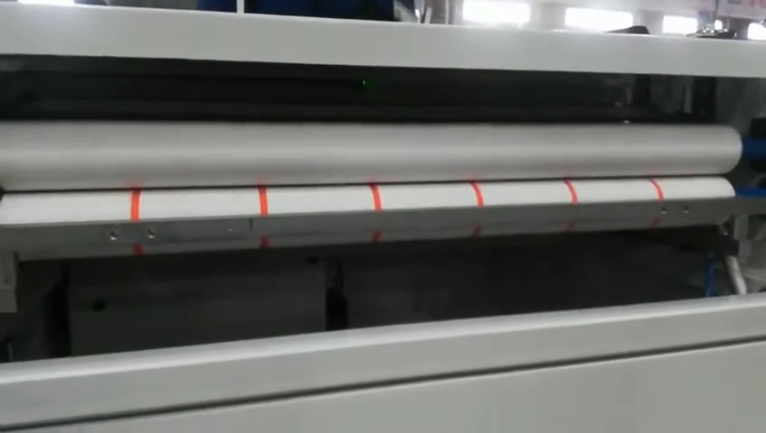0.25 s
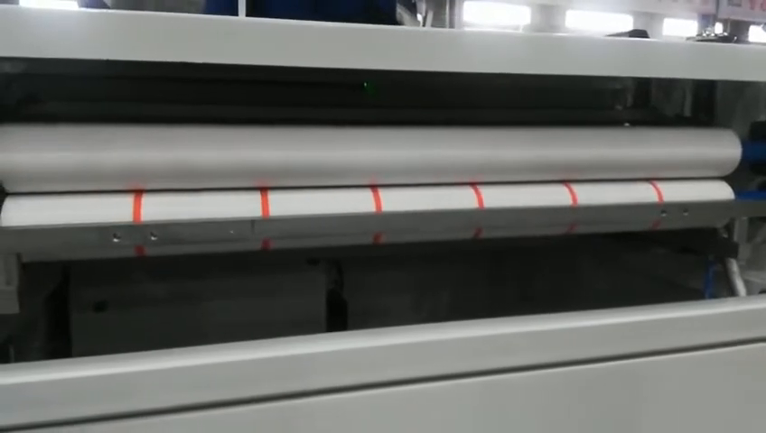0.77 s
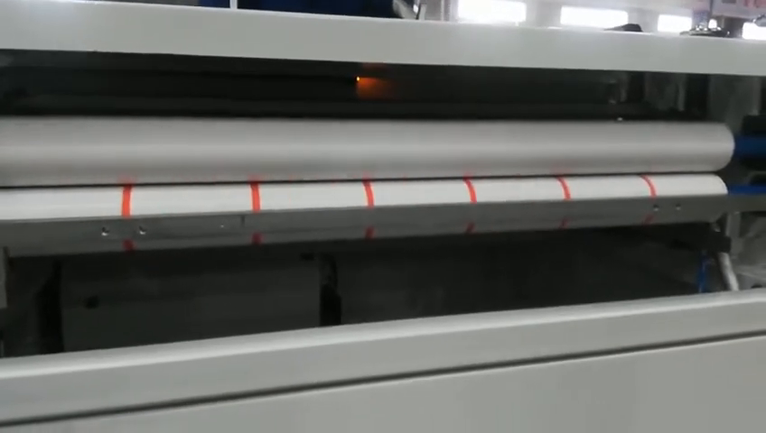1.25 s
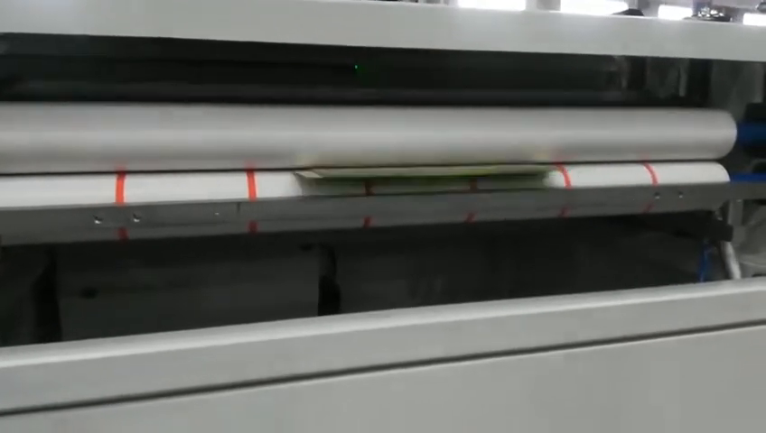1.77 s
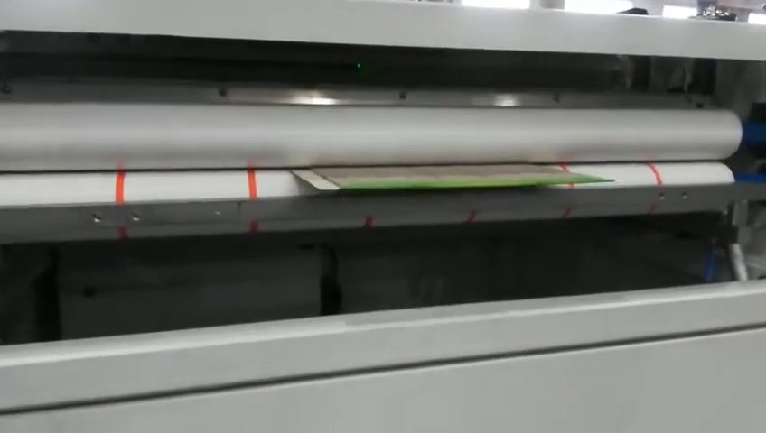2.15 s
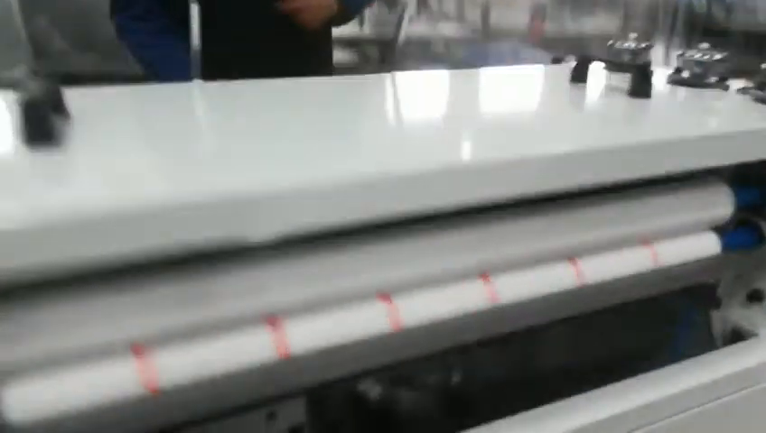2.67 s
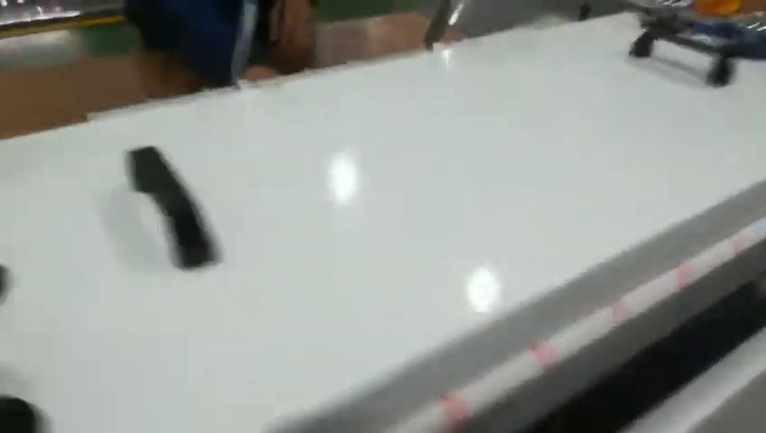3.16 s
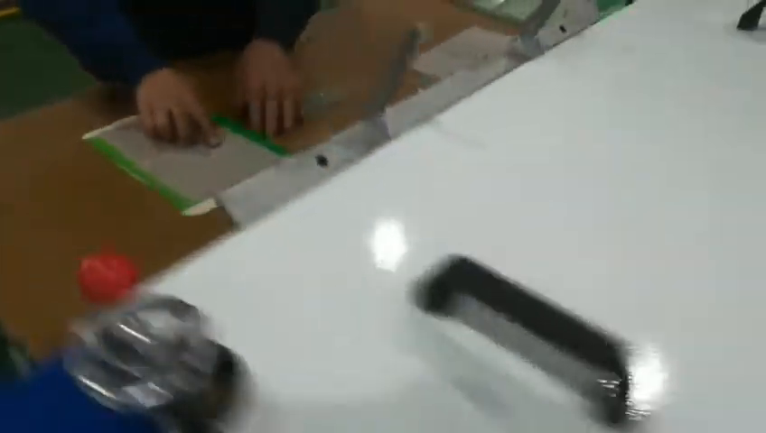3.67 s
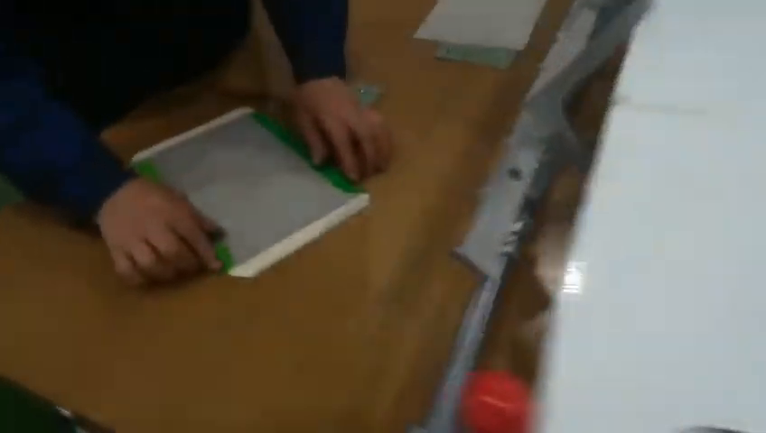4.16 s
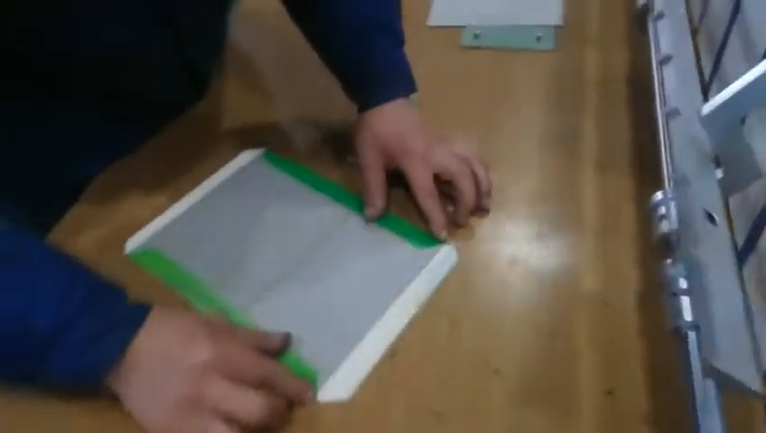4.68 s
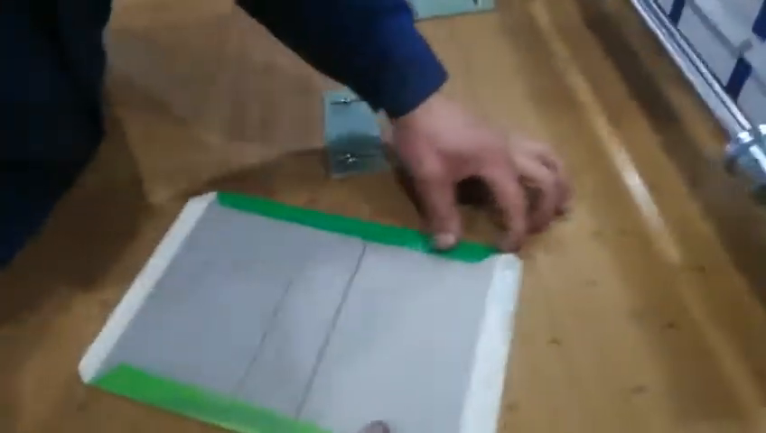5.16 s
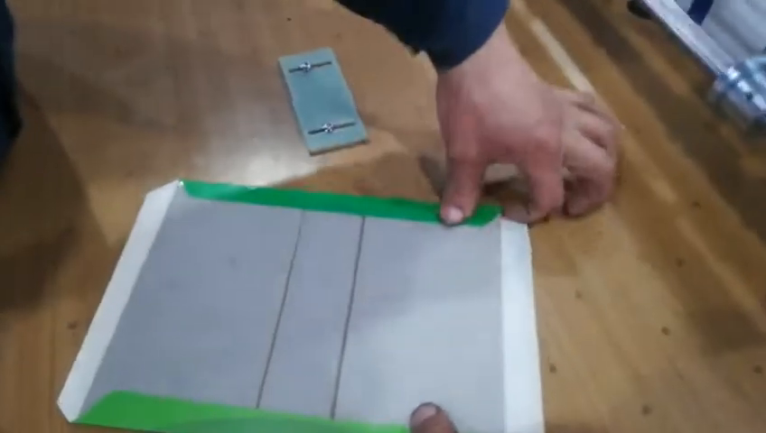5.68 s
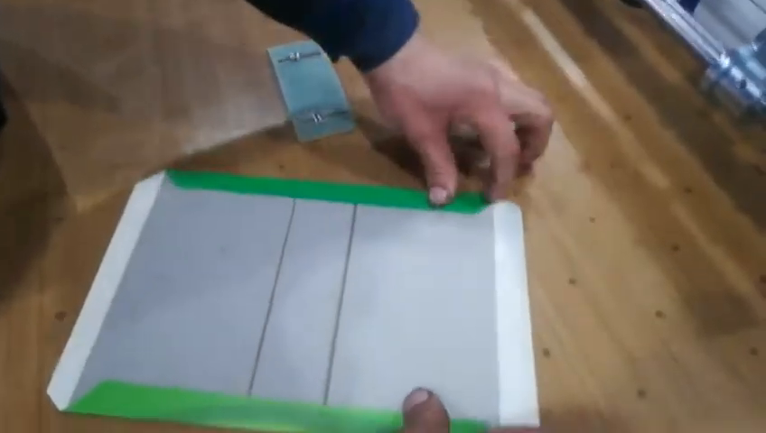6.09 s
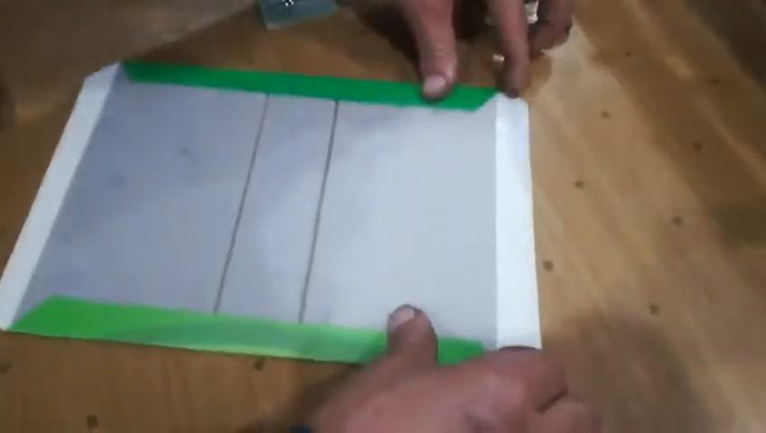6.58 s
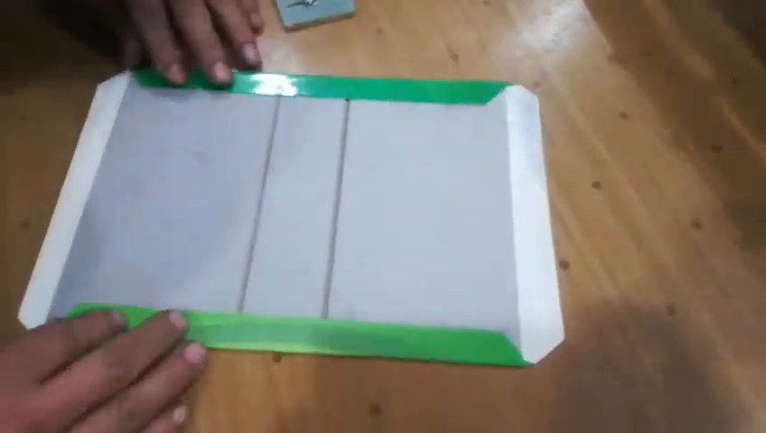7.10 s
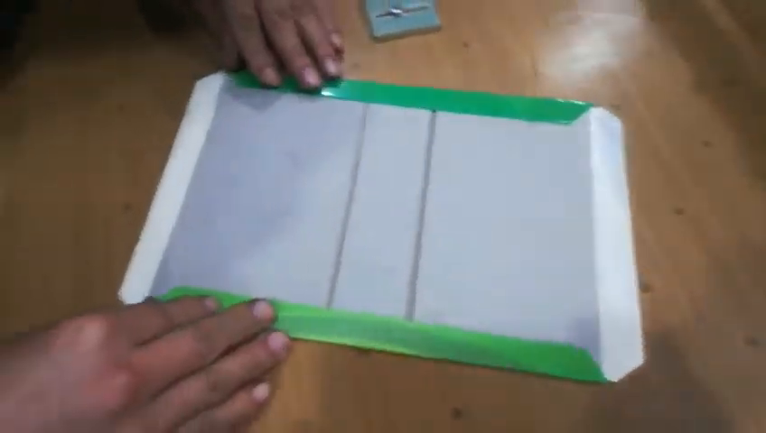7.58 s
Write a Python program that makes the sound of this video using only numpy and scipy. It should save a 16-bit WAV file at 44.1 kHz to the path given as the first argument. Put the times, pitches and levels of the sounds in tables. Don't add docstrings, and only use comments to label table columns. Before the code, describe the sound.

Beside a folding machine in a hard-walled factory hall, a motor hums and belts whirr throughout. After half a second, steel bars and covers start clattering close by, getting brighter and harder in a rapid irregular series until about three seconds. A valve then whistles and squeals, releasing a hissing air jet that fades, leaving the steady drone. Captured on a handheld phone, with soft grip thumps.

```python
import sys
import numpy as np
from scipy import signal
from scipy.fft import rfft, irfft
from scipy.io import wavfile
from scipy.ndimage import uniform_filter1d, minimum_filter1d

SR = 44100
rng = np.random.default_rng(int(sys.argv[2]) if len(sys.argv) > 2 else 0)


def generate_wav(sig):
    pcm = np.round(np.clip(np.atleast_2d(sig).T, -1, 1) * 32767).astype(np.int16)
    wavfile.write(sys.argv[1], SR, pcm)


def elevation(decibels):
    levels = np.asarray(decibels, float)
    return 10 ** (levels / 20)


N = 345744
TIME = np.arange(N) / SR
HZ = np.maximum(np.arange(N // 2 + 1) * SR / N, 1)

# pitch_hz, likeness (-1 to 1)
PORT_LIKENESS = [(60, 0.99), (130, 1), (290, 0.89), (640, -0.62), (1410, -0.065), (3100, -0.027),
                 (6820, -0.018), (15000, -0.051)]
# pitch_hz, left_minus_right_db
CLATTER_TILT = [(60, 0.0), (110, -11), (200, 12), (380, -2), (700, 2), (1290, 2), (2380, 9.5), (4400, -5.5),
                (8120, 6), (15000, 6)]
# pitch_hz, left_minus_right_db
JET_TILT = [(60, 0.5), (110, 0.5), (200, 0.5), (380, 0.0), (700, -5), (1290, 4), (2380, 4), (4400, -1.5),
            (8120, 4), (15000, 5)]
# start_s, level_db, length_s
GRIP_SHIFTS = [
    (0.44, -47, 0.087),
    (1.72, -37, .04),
    (1.84, -35, .06),
    (2.05, -43, .08),
    (2.64, -52, .1),
    (3.127, -46, 0.34),
    (3.82, -52, 0.11),
    (5.39, -51, 0.33),
    (7.6, -47, .2),
]
LEFT_DB = 0.5
DIRECT_SHARE, DIRECT_LAG = 0.26, 8
THRUM_DB = -53.5

# start_s,
# motor_db, belts_db
DRIVE_LEVELS = [(0, -44, -38), (0.6, -44, -41.5), (1.1, -44, -41.5), (1.8, -42.5, -49), (2.08, -40.5, -53),
                (2.6, -43, -38.5), (3.2, -41, -41), (4.3, -43.5, -40.5), (4.8, -41.5, -41.5),
                (6.4, -40.5, -41.5), (7.84, -42, -42)]
# pitch_hz, level_db (per Hz)
DRONE_COLOUR = [(35, -45), (60, -11), (76, -9.5), (98, -4), (135, -5.5), (188, -2.5), (408, -14.5),
                (470, -23.5), (500, -13.5), (650, -89), (1100, -120)]
# pitch_hz, level_db (per Hz)
WHIRR_COLOUR = [(210, -35), (350, -10), (500, -9), (760, -5), (1500, -11.5), (3700, -13), (4350, -7.5),
                (5000, -10.5), (6900, -15.5), (7300, -22), (10500, -33), (12000, -60), (15000, -56),
                (15700, -54)]
# pitch_hz, width_hz, level_db
GEAR_LINES = [(202.8, 19, -50), (148, 23, -64), (294.7, 15, -56), (719, 6.4, -60.5), (1758, 18, -59.5),
              (2355, 370, -53), (3376, 65, -65), (4140, 230, -66), (2794, 8, -66.5), (6300, 8, -79),
              (7000, 6, -77), (9120, 40, -75), (10510, 25, -78)]
# start_s, level_db, length_s
MOTOR_SURGES = [(0.736, -35, 0.54), (0.76, -39, 0.08), (0.925, -40.5, 0.24), (1.033, -39, 0.082),
                (1.186, -38, 0.13), (1.338, -31, 0.048), (1.447, -36.5, .12), (1.585, -34.5, 0.24),
                (1.807, -43, 0.296), (2.082, -36, 0.11), (2.288, -48, 0.21), (2.623, -45, 0.41)]
# pitch_hz, width_hz, level_db
HOUSING_MODES = [(108, 16, -9), (156.3, 17.5, 2.5), (248, 87, -4.5), (309, 14.5, 4.5)]
# start_s, level_db
COASTING = [
    (0, -37.5),
    (0.31, -54),
    (0.544, -75),
    (0.57, -60),
    (0.7, -44),
]
# pitch_hz, level_db (per Hz)
RUBBER_COLOUR = [(1180, -37), (2000, -13), (2750, 2.5), (3550, -11), (4150, 5), (4940, -12), (5780, 2),
                 (8000, -39), (10400, -56), (17600, -120)]
GEAR_DB, LOAD_RISE_S = 45, 0.02

# start_s, level_db, left_minus_right_db
HISS_LEVELS = [
    (3.3, -48, 2),
    (3.56, -43, 1),
    (3.8, -45.5, 2),
    (3.97, -35.5, 1),
    (4.2, -30.5, -0.5),
    (4.9, -30.5, 0),
    (5.08, -34, 0),
    (5.4, -46.5, 1),
    (5.6, -58, 0),
]
# pitch_hz, level_db (per Hz)
JET_COLOUR = [(590, -54), (1000, -34), (1290, -47), (1350, -29), (1690, -16), (1830, -18), (2670, -10),
              (3760, -9.5), (4430, -3.5), (6400, -4.5), (9000, -19.5), (11700, -37.5), (19800, -120)]
# pitch_hz, level_db (per Hz)
SIZZLE_COLOUR = [(5290, -19), (9000, 0.5), (9550, -2), (11800, -19), (14600, -24), (15500, -32)]
# start_s, end_s, pitch_hz, level_db, throb_hz
WHISTLES = [
    (3.38, 3.634, 5460, -51, 18),
    (3.55, 3.78, 4080, -51, 12),
    (3.682, 3.785, 5760, -42.5, 30),
    (3.825, 3.842, 5730, -46, 3),
]
# start_s, level_db, length_s
SQUEAL_SPURTS = [(3.73, -48, .42), (3.793, -36, .036), (3.838, -36, .028), (3.85, -42, .03),
                 (3.886, -38, .038), (3.905, -42, .02), (3.932, -39, .04), (3.976, -34, .028),
                 (4.001, -33, .024), (4.018, -37, .05), (4.068, -40, .04), (4.125, -42, .03)]
SQUEAL_HZ, SPURT_EDGE_S = 5125, 0.012
SIZZLE_DB, CRACK_S, CRACK_DB, CRACK_WIDTH_S = -17, 3.98, 9.5, 0.21

# start_s, peak_db, fade_s, cover_db
SLAMS = [(0.565, -34, 0.12, -2), (0.738, -22.5, 0.26, -1), (0.8939, -26.5, 0.5, -4.5),
         (0.9444, -19.5, 0.19, -17), (1.0131, -27, 0.11, -3), (1.0635, -23.5, .093, -5),
         (1.1124, -46, 0.072, -13), (1.1735, -21, 0.096, 0), (1.2623, -23, 0.12, -2),
         (1.2929, -9.5, 0.086, -16), (1.3187, -7.5, 0.11, -17), (1.5724, -3.5, 0.27, -24),
         (1.6821, -10.5, 0.23, -12), (1.8897, -20.5, 0.24, -28), (1.9446, -21.5, 0.069, -17),
         (1.9919, -29.5, 0.11, -3), (2.151, -19.5, .14, -25), (2.1899, -7, 0.23, -14.5),
         (2.2882, -13.5, 0.21, -11), (2.4495, -12, .16, -12), (2.4812, -.6, 0.14, -16),
         (2.848, -23, 0.09, -23), (2.8645, -9.5, 0.3, -11), (2.9602, -11.5, .22, -7.5),
         (3.047, -21.5, 0.083, -3)]
# start_s, peak_db, fade_s, cover_db
SLIPS = [(0.7515, -12.5, 0.081, -9), (0.7752, -27, 0.33, -9), (0.815, -17, 0.075, -5),
         (0.9647, -11.5, 0.08, -4), (1.1944, -25.5, 0.24, -21), (1.2214, -22.5, 0.086, 1),
         (1.3364, -6, .13, -15), (1.3624, -12.5, 0.17, -13), (1.4558, -11.5, 0.094, -28),
         (1.466, -1, 0.091, -32), (1.5894, 0, 0.13, -8), (1.6089, -6, 0.15, -27), (1.6314, -13, .13, -20),
         (1.6991, -8.5, .13, -5.5), (1.7354, -6, 0.17, -9), (1.7555, -11.5, 0.14, -12),
         (1.799, -17, 0.2, -9), (1.8422, -18, 0.13, -7), (2.1325, -18, 0.13, -13),
         (2.2044, -6.5, .12, -4.5), (2.24, -8.5, 0.13, -9), (2.261, -17.5, 0.087, -17),
         (2.5118, -8, 0.17, -5.5), (2.5497, -4.5, 0.13, -12), (2.5967, -7, .13, -14),
         (2.643, -10.5, .13, -16), (2.7144, -15.5, 0.054, -4.5), (2.8774, -6, .16, -0.5),
         (2.9258, -17, 0.2, -5), (2.9792, -11.5, 0.087, 0.5)]
# start_s, level_db, left_minus_right_db
LOOSE_PARTS = [
    (0.5, -60, 0),
    (0.6, -40, -3),
    (0.96, -35, -2),
    (1.4, -41.5, -2.5),
    (1.63, -23.5, -2),
    (1.79, -35, -3),
    (1.95, -43.5, -0.5),
    (2.45, -33.5, 0.3),
    (3.25, -54, -2),
]
# start_s, pitch_hz, level_db, length_s, width_hz
RINGING_PARTS = [(0.75, 5180, -28, 0.058, 180), (0.754, 2140, -29.5, 0.017, 170),
                 (1.17, 4000, -28.5, 0.074, 250), (1.291, 1230, -27.5, 0.017, 250),
                 (1.58, 1050, -36.5, 0.25, 36), (2.205, 880, -36, 0.031, 54),
                 (2.42, 1290, -30.5, 0.028, 300), (2.646, 4350, -16, .016, 300),
                 (2.875, 2470, -26, .035, 250), (3.11, 2450, -37, .03, 300), (2.93, 5350, -26, .02, 200),
                 (1.58, 6200, -22, .07, 900), (2.195, 6500, -21, .04, 800), (2.485, 6900, -22, .03, 990),
                 (1.458, 11500, -44, .04, 4000), (2.862, 4960, -15, 0.065, 240),
                 (2.864, 740, -23.5, 0.011, 270), (2.899, 472, -38, 0.24, 81),
                 (3.043, 2430, -34.5, 0.047, 300), (4.324, 4500, -35, 0.064, 270),
                 (1.19, 1400, -38, 0.15, 560), (1.601, 720, -32, 0.23, 190), (2.194, 1250, -31, 0.2, 250),
                 (2.484, 1530, -37, 0.12, 460), (2.645, 1520, -31, 0.019, 1200),
                 (2.867, 800, -29.5, 0.14, 410), (0.57, 2200, -43, .03, 230), (0.103, 718, -51, 0.81, 55),
                 (2.032, 940, -38, 0.13, 660), (3.098, 2350, -49, 0.037, 280), (0.95, 527, -40, .2, 300),
                 (0.565, 790, -44, 0.3, 350)]
# start_s, peak_db
TICKS = [(0.757, -15), (0.931, -18), (1.231, -18), (1.321, -8), (1.583, -8), (1.591, -7), (1.600, -7),
         (1.615, -5), (1.739, -10), (2.195, -7), (2.202, -7), (2.244, -11), (2.559, -11), (2.866, -5),
         (2.872, -8), (2.881, -5), (2.895, -8), (2.985, -11)]
# pitch_hz, level_db (per Hz)
STEEL_COLOUR = [(1760, -23), (3000, -10.5), (3390, -11), (4810, 0.5), (5390, -1), (6430, -3.5), (7500, -14),
                (9750, -37), (16500, -120)]
# pitch_hz, level_db (per Hz)
EDGE_COLOUR = [(4410, -17.5), (7500, -3.5), (9130, -5.5), (10100, -13), (11200, -14), (12300, -28.5),
               (14200, -33), (15500, -45)]
# pitch_hz, level_db (per Hz)
COVER_COLOUR = [(1120, -9.5), (1900, -4), (2530, -2), (2730, -2.5), (3000, -2.5), (3900, 1.5), (6600, -120)]
# pitch_hz, level_db (per Hz)
FRAME_COLOUR = [(260, -41), (450, 0), (536, -4.5), (783, 3.5), (956, -2.5), (1160, 3.5), (1900, -5.5),
                (2470, -30), (4180, -120)]
FOLD_S = 1.21
EDGE_DB, FRAME_DB = (-26, -10.5), (-11.5, -28)
EDGE_PER_DB, FRAME_PER_DB = 0.58, -0.25
SHAKE_EDGE_DB, SHAKE_COVER_DB, SHAKE_FRAME_DB = (-26, -20), -4, -4.5
SLAM_RISE_S, SLIP_RISE_S = 0.001, 0.011
TICK_DB, TICK_T60_S, TICK_RISE_S = -8, 0.015, 0.0005
HALL_T60_S, HALL_DB = 0.7, -8


def unit(x):
    return x / np.sqrt(np.mean(x ** 2))


def columns(table):
    start_s, *rest = np.transpose(table)
    return [np.interp(TIME, start_s, column) for column in rest]


def fade(start, end, edge):
    return np.clip((TIME - start) / edge, 0, 1) * np.clip((end - TIME) / edge, 0, 1)


def decay(t, t60):
    return np.exp(-np.log(1000) * t / t60)


def spread(pan_db):
    return elevation(np.array([pan_db, -pan_db]) / 2)


def colour(x, points, share=1):
    hz, db = np.transpose(points)
    n = x.shape[-1]
    axis = np.arange(n // 2 + 1) * SR / n
    curve_db = np.interp(np.log(axis + 1), np.log(hz), db)
    return irfft(rfft(x) * elevation(share * curve_db), n)


def tilt(x, points, left_share, right_share):
    return np.array([colour(x[0], points, left_share), colour(x[1], points, right_share)])


def ring(x, modes):
    n = x.shape[-1]
    axis = np.arange(n // 2 + 1) * SR / n
    response = sum(elevation(db) / (1 + 2j * (axis - hz) / width) for hz, width, db in modes)
    return irfft(rfft(x) * response, n)


def walk(rate):
    hold = int(SR / rate)
    steps = np.repeat(rng.standard_normal(N // hold + 1), hold)
    return 1.48 * uniform_filter1d(uniform_filter1d(steps, hold), hold)[:N]


def flicker(x, own_db, rate):
    spectrum, out = rfft(x), 0
    band = np.round(1.5 * np.log2(HZ / 30)).clip(0)
    for k in np.unique(band):
        out = out + irfft(spectrum * (band == k), N) * elevation(own_db * walk(rate))
    return out


def ports():
    hz, share = np.transpose(PORT_LIKENESS)
    like = np.clip(np.interp(np.log(HZ), np.log(hz), share), -1, 1)
    mid, side = rfft(rng.standard_normal((2, N)))
    opposed = np.array([[1], [-1]]) * side * np.sqrt(1 - like)
    return irfft(mid * np.sqrt(1 + like) + opposed, N)


def hall_echo(near):
    t = np.arange(int(HALL_T60_S * SR)) / SR
    tail = rng.standard_normal((2, len(t))) * decay(t, HALL_T60_S)
    tail = tail / np.sqrt((tail ** 2).sum(axis=1, keepdims=True))
    echo = signal.fftconvolve(near, tail, axes=1)[:, :N]
    return colour(echo, [(500, 2.0), (5000, -4.0), (10000, -5.0), (16000, -31)])


def handling():
    grip = elevation(THRUM_DB)
    for s, db, length in GRIP_SHIFTS:
        grip = grip + elevation(db) * np.exp(-((TIME - s) / length) ** 2)
    rub = colour(rng.standard_normal(N), [(15, -18), (35, 15.0), (55, 26.0), (90, -44)])
    return unit(rub) * grip * elevation(-6.5)


def coasting_rollers():
    level_db, = columns(COASTING)
    return unit(colour(ports(), RUBBER_COLOUR)) * elevation(level_db + 1.0) * fade(-1, COASTING[-1][0], 0.093)


def drive():
    motor_db, belts_db = columns(DRIVE_LEVELS)
    drone = unit(flicker(colour(ports(), DRONE_COLOUR), 0.55, 11)) * elevation(motor_db)
    whirr = unit(flicker(colour(ports(), WHIRR_COLOUR), 0.57, 7)) * elevation(belts_db)
    gears = 0
    for hz, width, db in GEAR_LINES:
        gears = gears + unit(ring(ports(), [(hz, width, 0)])) * elevation(db + 0.92 * walk(2.44))
    surges = sum(elevation(db) * fade(s, s + length, LOAD_RISE_S) for s, db, length in MOTOR_SURGES)
    load = unit(ring(ports(), HOUSING_MODES)) * surges
    return drone + whirr + gears * elevation(GEAR_DB + motor_db) + load


def air_jet():
    hiss_db, pan_db = columns(HISS_LEVELS)
    crack = np.exp(-((TIME - CRACK_S) / CRACK_WIDTH_S) ** 2)
    sizzle_db = SIZZLE_DB + CRACK_DB * crack - 12 * np.clip(TIME - 5.0, 0, 1)
    jet = unit(flicker(colour(ports(), JET_COLOUR), 0.6, 11))
    jet = jet + 0.26 * unit(ring(ports(), [(4330, 270, 0)]))
    jet = jet + unit(colour(ports(), SIZZLE_COLOUR)) * elevation(sizzle_db)
    jet = jet * fade(HISS_LEVELS[0][0], HISS_LEVELS[-1][0], 0.069) * elevation(hiss_db) * spread(pan_db)
    return tilt(jet, JET_TILT, 0.53, -0.61)


def valve_tone(hz):
    cycles = np.cumsum(hz * (1 + 0.002 * walk(60))) / SR
    return np.sin(2 * np.pi * cycles + np.array([[0], [0.6]]))


def valve():
    spurts = sum(elevation(db) * fade(s, s + length, SPURT_EDGE_S) for s, db, length in SQUEAL_SPURTS)
    out = spurts * valve_tone(SQUEAL_HZ)
    for start, end, hz, db, throb_hz in WHISTLES:
        swell = np.sin(np.pi * np.clip((TIME - start) / (end - start), 0, 1)) ** 0.99
        throb = 1 + 0.51 * np.sin(2 * np.pi * throb_hz * TIME)
        out = out + elevation(db) * swell * throb * valve_tone(hz)
    return out


def chatter(size, spread_db):
    clusters = np.repeat(rng.standard_normal(size // 128 + 1), 128)
    clusters = uniform_filter1d(clusters, size=96)[:size]
    left, other = rng.standard_normal((2, size))
    right = DIRECT_SHARE * np.roll(left, DIRECT_LAG) + np.sqrt(1 - DIRECT_SHARE ** 2) * other
    return np.array([left, right]) * elevation(spread_db * clusters)


def steel(force, shares_db, modes):
    out = 0
    for part, db in zip((STEEL_COLOUR, EDGE_COLOUR, COVER_COLOUR, FRAME_COLOUR), shares_db):
        impacts = chatter(size=force.shape[-1], spread_db=2.2)
        impacts = impacts + 1.54 * ring(impacts, modes)
        out = out + colour(impacts * force * elevation(db), part) / colour(impacts, part).std()
    return out


def loose_parts():
    shake_db = columns(LOOSE_PARTS)[0]
    feeding_db, folding_db = SHAKE_EDGE_DB
    force = fade(LOOSE_PARTS[0][0], LOOSE_PARTS[-1][0], 0.1) * elevation(shake_db)
    shares_db = (0, np.where(TIME > FOLD_S, folding_db, feeding_db), SHAKE_COVER_DB, SHAKE_FRAME_DB)
    return steel(force, shares_db, [(4230, 290, 0), (6100, 420, -27)])


def ticks():
    force, t = np.zeros(N), np.arange(2048) / SR
    for s, db in TICKS:
        a = int(s * SR)
        force[a:a + len(t)] += elevation(db + TICK_DB) * np.minimum(t / TICK_RISE_S, 1) * decay(t, TICK_T60_S)
    return steel(force, (0, np.where(TIME > FOLD_S, -16, -24), -10, -30), [(5100, 500, -6)])


def blow_shares(s, db, cover_db):
    stage = int(s > FOLD_S)
    return 0, EDGE_DB[stage] + EDGE_PER_DB * db, cover_db, FRAME_DB[stage] + FRAME_PER_DB * db


def clatter():
    out = loose_parts()
    size, lead = 16384, 1024
    t = np.maximum(np.arange(size) - lead, 0) / SR
    for table, rise in ((SLAMS, SLAM_RISE_S), (SLIPS, SLIP_RISE_S)):
        for s, db, t60, cover_db in table:
            onset = 1 - np.exp(-(t / rise) ** 2)
            burst = onset * np.exp(-np.log(1000) * (t / max(t60, 0.02)) ** 1.21)
            modes = [(2000 + 7500 * pick, 110, -3) for pick in rng.random(28)]
            a = int(s * SR) - lead
            out[:, a:a + size] += steel(burst * elevation(db - 4), blow_shares(s, db, cover_db), modes)
    for s, hz, db, length, width in RINGING_PARTS:
        a = int(s * SR) - lead
        struck = np.minimum(t / 0.002, 1) * np.exp(-(t / length) ** 2)
        tone = ring(rng.standard_normal((2, size)), [(hz, width, 0)])
        tone = ring(tone, [(hz, 2 * width, 0)])
        out[:, a:a + size] += elevation(db) * struck * unit(tone)
    out = out + ticks()
    pan_db = columns(LOOSE_PARTS)[1]
    out = colour(out * spread(pan_db), [(120, -28), (350, 0)])
    return tilt(out, CLATTER_TILT, 0.91, -0.25)


def scene():
    background = drive() + coasting_rollers() + handling()
    air = air_jet() + valve()
    near = clatter()
    return background + air + elevation(HALL_DB) * hall_echo(near) + near


def top_cut(x):
    return signal.sosfilt(signal.butter(12, 15630, fs=SR, output="sos"), x)


def record(dry):
    fall = np.exp(-1 / (0.03 * SR))
    peak = -minimum_filter1d(-np.abs(dry).max(axis=0), size=600)
    loud = signal.lfilter([1 - fall], [1, -fall], peak)
    gain = np.minimum(1, elevation(-9.5) / (loud + 1e-9)) ** 0.45
    ears = elevation(np.array([[LEFT_DB], [-LEFT_DB]]) / 2)
    mix = np.clip(dry * gain * ears, -0.98, 0.98)
    return top_cut(mix)


dry = scene()
out = record(dry)
generate_wav(out)
```